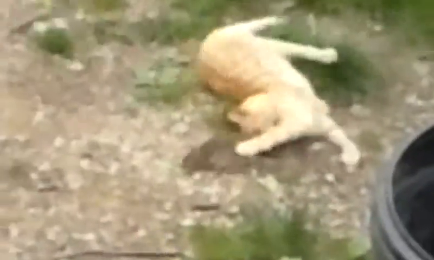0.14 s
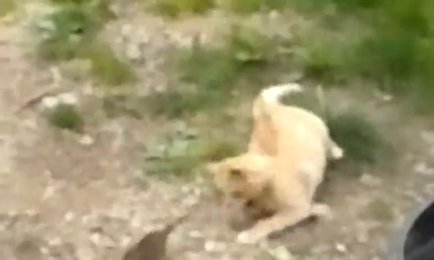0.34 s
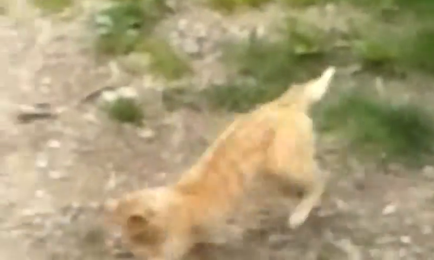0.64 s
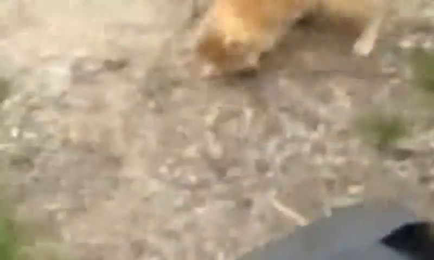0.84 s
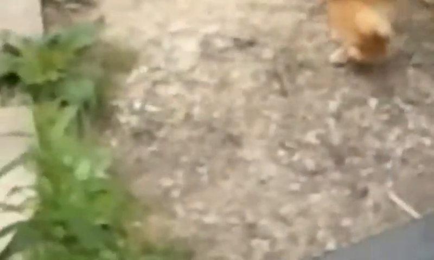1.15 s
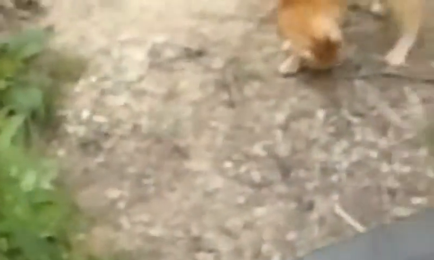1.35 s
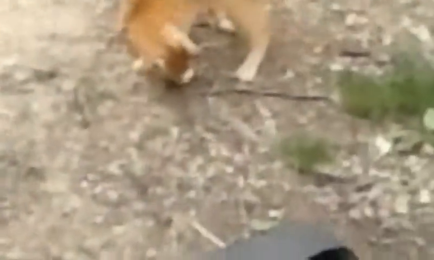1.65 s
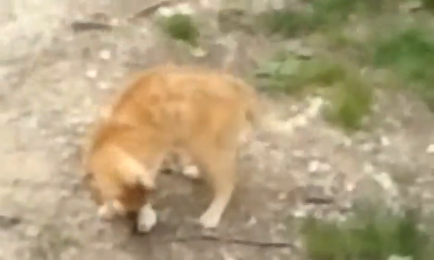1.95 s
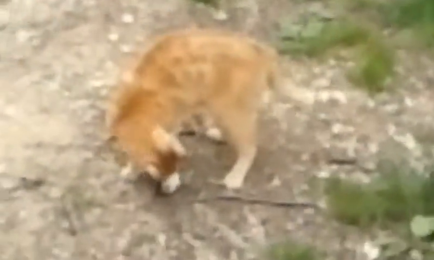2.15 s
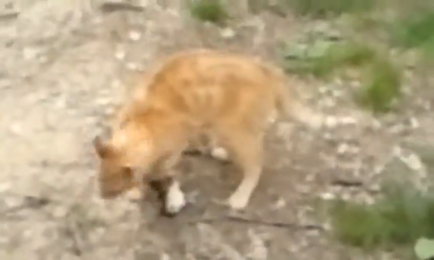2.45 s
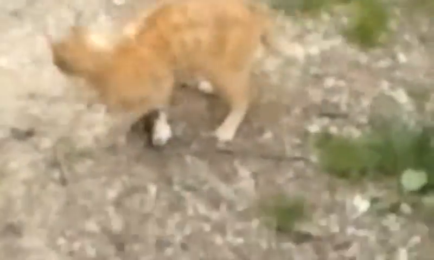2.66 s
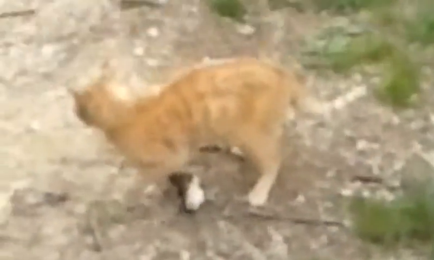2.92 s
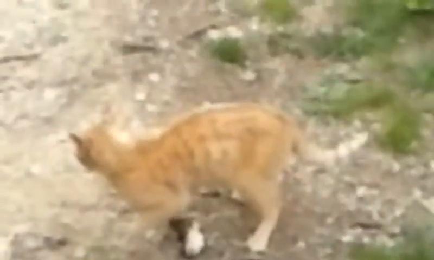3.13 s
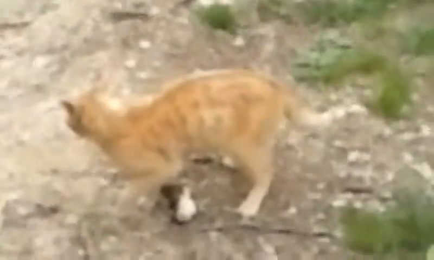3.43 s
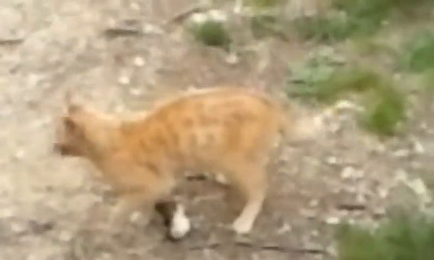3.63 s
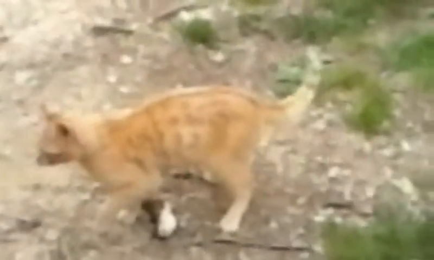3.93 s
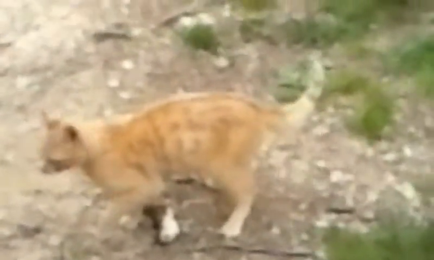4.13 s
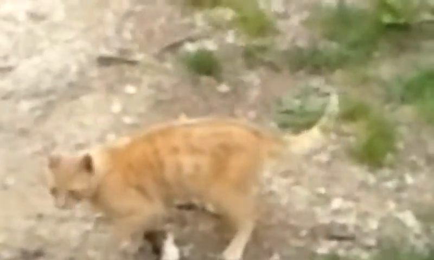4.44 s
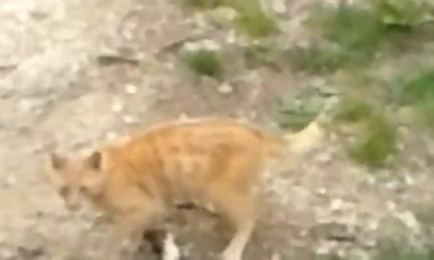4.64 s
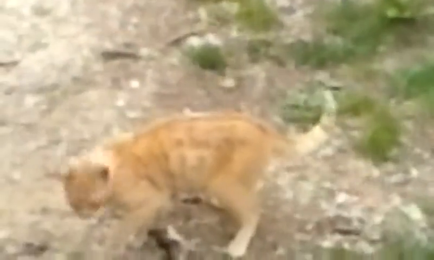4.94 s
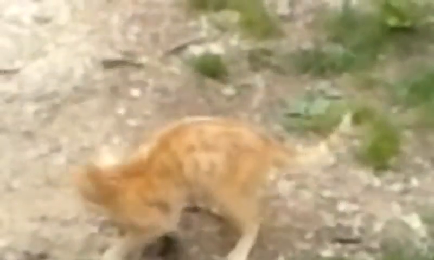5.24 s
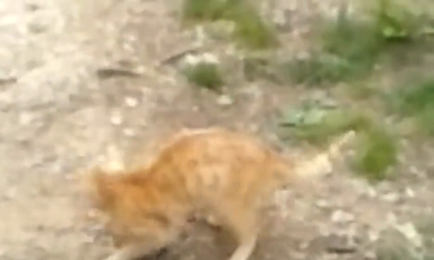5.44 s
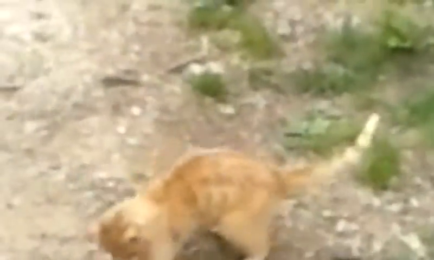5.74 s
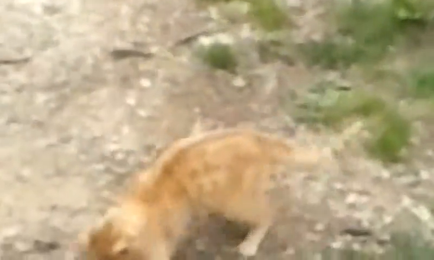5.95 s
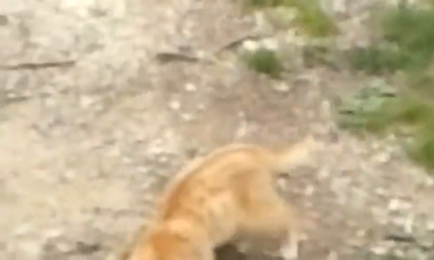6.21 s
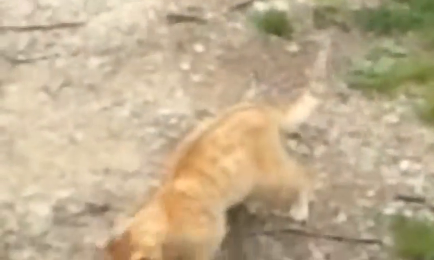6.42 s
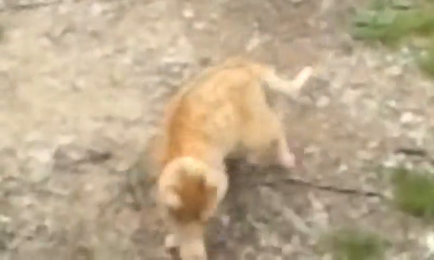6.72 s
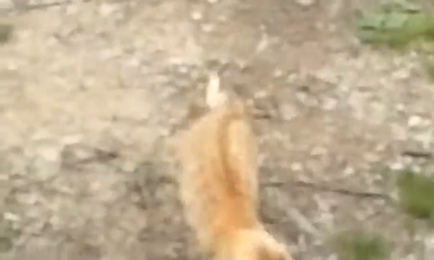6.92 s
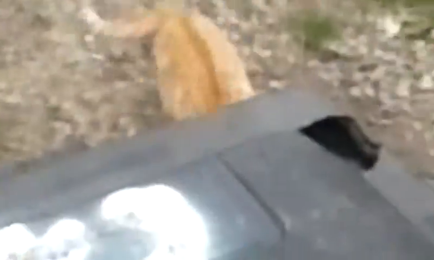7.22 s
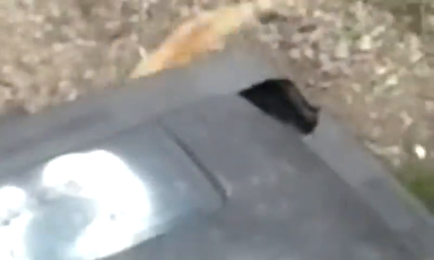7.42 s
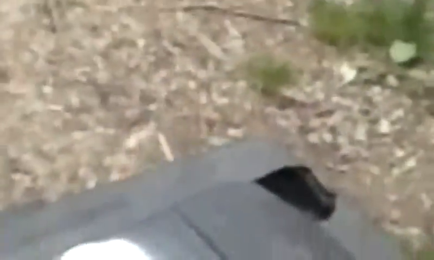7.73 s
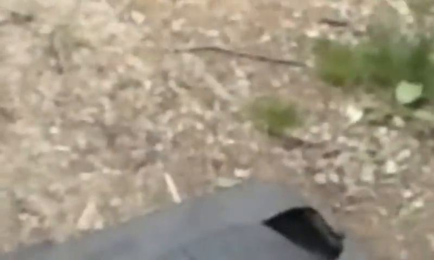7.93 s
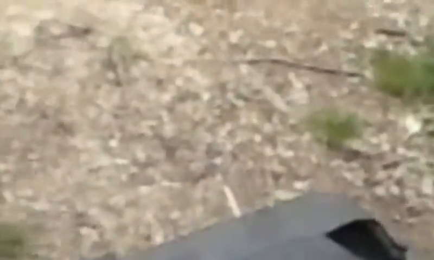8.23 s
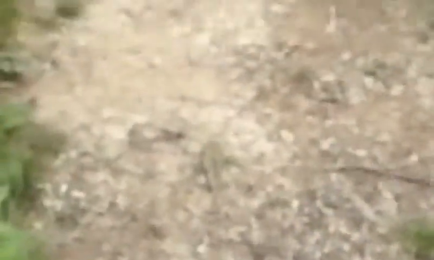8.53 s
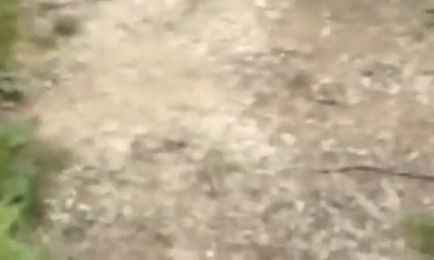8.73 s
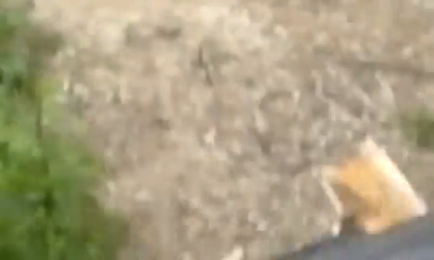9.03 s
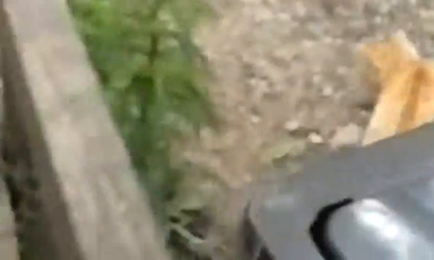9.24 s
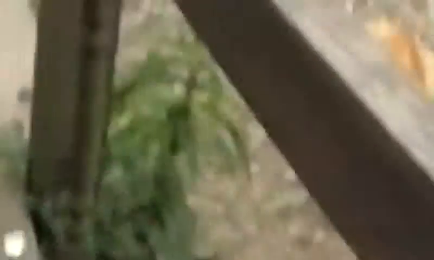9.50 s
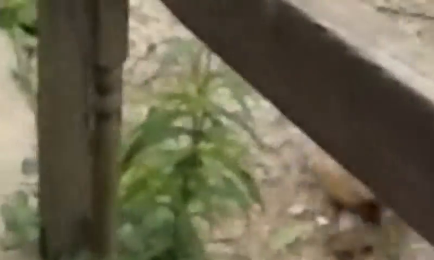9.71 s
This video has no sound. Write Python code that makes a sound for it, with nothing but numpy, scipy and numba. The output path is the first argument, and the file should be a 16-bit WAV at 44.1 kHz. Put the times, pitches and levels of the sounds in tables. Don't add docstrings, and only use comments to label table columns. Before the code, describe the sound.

Summer yard, one small handheld microphone, mono. Insects drone brightly and unevenly from start to end. A falling bird whistle comes early, followed by a finger tick, faint upward flicks about six a second, and a swelling seven-note trill. A tiny motor whine passes. Later a far vehicle speeds up, casing clicks and scrapes crowd in, and very high peeps sound close by, over low road rumble.

```python
import sys
import numpy as np
from scipy import signal
from scipy.fft import rfft, irfft, next_fast_len
from scipy.io import wavfile
from numba import njit

SR = 44100
rng = np.random.default_rng(int(sys.argv[2]) if len(sys.argv) > 2 else 0)


def store_pcm(level_fs):
    pcm = np.round(np.clip(level_fs, -1, 1) * 32767).astype(np.int16)
    wavfile.write(sys.argv[1], SR, np.atleast_2d(pcm).T)


def elevation(decibels):
    levels = np.asarray(decibels, float)
    return 10 ** (levels / 20)


N = 435266


def unit(x):
    return x / np.sqrt(np.mean(x ** 2))


def curve(table):
    s, *columns = np.transpose(table)
    return [np.interp(np.arange(N) / SR, s, c) for c in columns]


def swells(rows):
    t = np.arange(N) / SR
    total = np.zeros((2, N))
    for s, length, first_db, second_db in rows:
        rise = np.clip(1 - abs(t - s) / length, 0, 1)
        total += rise * np.array([[first_db], [second_db]])
    return total


def coloured(spectrum):
    hz, db = np.transpose(spectrum)
    size = next_fast_len(N)
    log_hz = np.log(np.arange(size // 2 + 1) * SR / size + 1)
    gain = elevation(np.interp(log_hz, np.log(hz), db, -120, -120))
    return unit(irfft(rfft(rng.standard_normal(size)) * gain, size)[:N])


def walk(rate):
    levels = rng.standard_normal(int(N / SR * 40))
    return 0.89 * np.interp(np.arange(N) * rate / SR, np.arange(len(levels)), levels)


@njit
def svf(x, hz, width):
    y, b, l = np.empty(len(x)), 0., 0.
    for i in range(len(x)):
        g, k = np.tan(np.pi * hz[i] / SR), width / hz[i]
        v = (b + g * (x[i] - l)) / (1 + g * (g + k))
        b, l, y[i] = 2 * v - b, l + 2 * g * v, k * v
    return y


def band(x, hz, width_hz):
    hz = np.full(len(x), 1.) * hz
    return svf(svf(x, hz, 1. * width_hz), hz, 1. * width_hz)


def add(out, s, sound):
    i = int(s * SR)
    out[i:i + len(sound)] += sound[:N - i]


def tone(rows, fade_s, wobble_hz=0.):
    s, hz, db = np.transpose(rows)
    t = np.arange(s[0], s[-1], 1 / SR)
    ends = np.clip(np.minimum(t - s[0], s[-1] - t) / fade_s, 0, 1)
    wobble = wobble_hz * np.interp(t - s[0], np.arange(64) / 180, rng.standard_normal(64))
    phase = 2 * np.pi * np.cumsum(np.interp(t, s, hz) + wobble) / SR
    return 2 ** .5 * ends * elevation(np.interp(t, s, db)) * np.sin(phase)


# (time [s], level [dB], centre [Hz])
CHORUS = [(0.0, -37, 7230), (0.96, -36, 6760), (1.43, -49.5, 6200), (1.65, -37.5, 7360),
          (2.83, -39.5, 7300), (3.49, -47, 6850), (3.57, -40.5, 7200), (3.85, -47, 6750),
          (3.96, -41.5, 6460), (4.51, -43, 6970), (6.95, -47.5, 6900), (7.53, -35.5, 7300),
          (7.75, -39.5, 7450), (8.6, -38.5, 7310), (9.02, -32.5, 7370), (9.32, -40, 7380),
          (9.62, -36.5, 7930), (9.87, -40.5, 7720)]
# (pitch [Hz], level [dB per Hz])
CHORUS_TOP = [(4710, -56), (8000, -17), (11800, -33), (15700, -35.5)]
# (peak time [s], rise and fall time, each [s], chorus change [dB], extra
# top change [dB])
CHORUS_SWELLS = [(.65, .2, 0, 4), (1.15, .1, 1, 2), (2.0, .5, 0, -4), (2.92, .12, 1, 8), (4.78, .07, 2, 2),
                 (5.85, .2, -7, 7), (6.1, .17, 4, 2), (6.6, .2, -4, 0), (6.85, .12, 2, 3), (7.2, .15, -1, -5),
                 (8.95, .2, 0, -6), (9.5, .14, -3, 6)]
CHORUS_MEAN_DB, TOP_DB, TOP_FOLLOW = -42.5, -7.5, 0.88


def insects():
    level_db, centre_hz = curve(CHORUS)
    shade_db, bright_db = swells(CHORUS_SWELLS)
    level_db = level_db + shade_db
    clicks = rng.standard_normal(N) * elevation(3.0 * np.minimum(rng.exponential(size=N), 5))
    body = unit(band(clicks, centre_hz, 2100)) * elevation(level_db - 0.57 + 1.46 * walk(25))
    top_db = CHORUS_MEAN_DB + TOP_DB + bright_db + TOP_FOLLOW * (level_db - CHORUS_MEAN_DB)
    return body + coloured(CHORUS_TOP) * elevation(top_db + 1.8 * walk(12))


def foliage(note, scatter_db, perch, spread_s=0.0093, gap_s=.003):
    trees_db, t60 = perch
    sway_per_s, sway_share = 45, .1
    t, size = np.arange(SR // 2) / SR, np.linalg.norm(note)
    near = rng.standard_normal(len(t)) * np.exp(-t / spread_s) * (t > gap_s)
    far = rng.standard_normal(len(t)) * elevation(-60 * t / t60) * (t > .025)
    sway_steps = np.arange(len(note) + len(t) - 1) * sway_per_s / SR
    sway = np.interp(sway_steps, np.arange(256), rng.standard_normal(256))
    far = signal.fftconvolve(note, far) * (np.sqrt(1 - sway_share) + np.sqrt(sway_share) * sway)
    near = signal.fftconvolve(note, near[:SR // 8])
    echo = far * elevation(trees_db) * size / np.linalg.norm(far)
    share = np.hypot(1, elevation(scatter_db))
    add(echo, 0, near * size / np.linalg.norm(near) * elevation(scatter_db) / share)
    add(echo, 0, note / share)
    return echo


def whistle(row, habit):
    s, length, from_hz, to_hz, db = row
    glide, peak, start_db, end_db = habit
    share = np.sort(np.clip([0, glide, peak, 1], 0, 1))
    pitch_hz = np.interp(share, [0, glide], [from_hz, to_hz])
    level_db = db + np.interp(share, [0, peak, 1], [start_db, 0, end_db])
    return np.c_[share * length, pitch_hz, level_db]


# (far trees level [dB], time to fade by 60 dB [s])
OPEN_PERCH, SOFT_PERCH, RISING_PERCH = (-10, .7), (-10, .35), (-6, .5)
TRILL_PERCH, SLIDE_PERCH = (-8.5, .5), (-10.5, .42)

# (time [s], peak level [dB], pitch [Hz])
TRILL = [
    (5.177, -34, 3980),
    (5.3134, -35, 4040),
    (5.4463, -28, 4250),
    (5.5802, -23, 4300),
    (5.706, -20, 4380),
    (5.8306, -19.5, 4400),
    (5.9574, -19.5, 4404),
]
# (time after start [s], pitch [Hz], level [dB])
TRILL_MAIN = [(-.004, 4800, -14), (.002, 4520, 0), (.007, 4300, -1), (.012, 4190, -12), (.028, 4130, -19)]
# (time after start [s], pitch [Hz], level [dB])
TRILL_OPENING = [(-.006, 4700, -9), (.004, 4300, -5), (.011, 3980, 0), (.02, 3830, -9)]
# (time after start [s], pitch [Hz], level [dB])
TRILL_GRACE = [(-.015, 5800, -3), (-.008, 5500, 0), (0, 5200, 1), (.006, 4900, -1)]
# (time after start [s], pitch [Hz], level [dB])
TRILL_ANSWER = [(.062, 3620, 1), (.069, 3400, 1), (.074, 3000, -4), (.08, 2500, 0)]


def trill():
    out = np.zeros(N)
    for s, db, hz in TRILL:
        opening = s < 5.4
        shy_db = -11 if opening else 0
        main = TRILL_OPENING if opening else np.array(TRILL_MAIN) * [1, hz / 4394, 1]
        parts = ((main, -2.5, -5.5), (TRILL_GRACE, -13 + shy_db, 9), (TRILL_ANSWER, -18.5 + shy_db, -2))
        for note, rel_db, scatter_db in parts:
            sound = foliage(tone(note, 0.0013, wobble_hz=60), scatter_db, TRILL_PERCH, spread_s=0.016, gap_s=.008)
            add(out, s + note[0][0], elevation(db + rel_db) * sound)
    return out


# (time [s], length [s], start pitch [Hz], goal pitch [Hz], peak level [dB])
LOW_BIRD = [(0.0, 0.045, 2674, 2700, -50), (0.103, .07, 2600, 2340, -35), (0.275, 0.08, 2775, 2358, -34),
            (0.445, .068, 2820, 2280, -31), (7.285, .025, 2680, 2520, -52), (7.31, 0.055, 2450, 2420, -51),
            (8.29, 0.035, 2330, 2300, -54), (8.425, 0.06, 2340, 2300, -54)]
# (time [s], length [s], start pitch [Hz], goal pitch [Hz], peak level [dB])
MID_BIRD = [
    (0.668, 0.105, 3500, 2780, -25.5),
    (1.02, .08, 2950, 3050, -50),
    (7.72, 0.08, 3120, 3360, -49),
]
# (time [s], length [s], start pitch [Hz], goal pitch [Hz], peak level [dB])
SOFT_OPENER = (2.5, .185, 1680, 1930, -43)
# (time [s], length [s], start pitch [Hz], goal pitch [Hz], peak level [dB])
SLIDES = [(1.3, .065, 2335, 2030, -39), (9.075, .075, 3100, 3380, -42), (9.19, .1, 3450, 3470, -44),
          (9.642, .1, 2790, 2660, -43.5), (9.735, .045, 2740, 2640, -43), (9.615, .03, 3100, 2800, -50),
          (9.81, .03, 2720, 2660, -52), (9.845, .02, 2700, 2740, -50), (9.505, .04, 3560, 3580, -53),
          (1.2, .065, 2800, 2850, -46)]
# (time [s], length [s], start pitch [Hz], goal pitch [Hz], peak level [dB])
HIGH_BIRD = [(0.56, .06, 6100, 6330, -42), (0.78, .06, 6450, 6500, -40), (.86, .04, 6300, 5960, -40),
             (3.94, .12, 5880, 6300, -38.5), (4.05, 0.21, 6280, 6380, -45), (4.28, 0.046, 5920, 5800, -45),
             (7.25, 0.045, 6300, 5850, -44), (7.298, .07, 5980, 5830, -41), (7.378, .04, 5930, 6060, -41),
             (7.425, .045, 6080, 6100, -45), (7.535, .04, 6050, 5980, -46), (7.59, .045, 5950, 5750, -47),
             (7.12, .05, 5050, 5350, -47), (7.19, .05, 6400, 6700, -45), (6.085, .08, 4300, 5100, -52)]
# (share of note gliding, share at the peak, start level [dB], end level [dB])
LOW_HABIT, MID_HABIT, HIGH_HABIT = (.6, .45, -13, -3), (0.72, 0.7, -24, -15), (0.9, 0, -5, -3)
# (share gliding, share at the peak, start level [dB], end level [dB])
OPENER_HABIT = (.45, .5, -15, -4)
# (share gliding, share at the peak, start level [dB], end level [dB])
SLIDE_HABIT = (.9, .25, -7, -9)


def whistling_birds():
    out = np.zeros(N)
    for flock, habit, scatter_db, wobble_hz, perch in (
            (LOW_BIRD, LOW_HABIT, -11, 12, OPEN_PERCH),
            (MID_BIRD, MID_HABIT, -10, 12, OPEN_PERCH),
            ([SOFT_OPENER], OPENER_HABIT, -6, 20, SOFT_PERCH),
            (SLIDES, SLIDE_HABIT, -8, 20, SLIDE_PERCH),
            (HIGH_BIRD, HIGH_HABIT, -5, 70, SLIDE_PERCH)):
        for row in flock:
            add(out, row[0], foliage(tone(whistle(row, habit), 0.0024, wobble_hz), scatter_db, perch))
    return out


# (time [s], length [s], start pitch [Hz], goal pitch [Hz], peak level [dB])
PEEPS = [
    (8.905, .025, 7050, 7755, -25.5),
    (8.98, .02, 7599, 7800, -28),
    (9.05, .02, 7638, 7675, -25),
]
PEEP_HABIT = (1.2, .55, -13, -12)  # (share gliding, share at the peak, start level [dB], end level [dB])


def peeping_bird():
    out = np.zeros(N)
    for row in PEEPS:
        add(out, row[0], tone(whistle(row, PEEP_HABIT), .004))
    return out


# (mid-sweep time [s], level [dB], change of the flat foot [dB])
RISING = [(1.647, -53, -1), (1.808, -44, -25), (1.99, -52, 2), (2.308, -55, -1), (2.488, -52, 4),
          (2.656, -50, 6), (2.846, -40.5, -8.5), (3.012, -44.5, 2), (3.172, -45.5, 6), (3.32, -43, 1),
          (3.478, -42.5, 2), (3.633, -40.5, -5), (3.784, -39.5, -13), (3.94, -41, 4.5), (4.086, -42, 3),
          (4.234, -41.5, -2), (4.38, -42.5, -10), (4.531, -41, 1), (4.681, -44.5, 5), (4.831, -46, 7),
          (4.982, -46, 6)]
# (time from mid sweep [s], pitch [Hz], level [dB])
RISING_NOTE = [(-.038, 2640, -10), (-.022, 2720, -2), (-.012, 2850, 4.5), (-.001, 3200, 0),
               (.007, 3480, -7), (.014, 4050, -15)]


def rising_flicks():
    out = np.zeros(N)
    for s, db, foot_db in RISING:
        note = np.array(RISING_NOTE)
        note[:2, 2] += foot_db
        sound = foliage(tone(note, 0.0041, wobble_hz=70), -2, RISING_PERCH, spread_s=0.013, gap_s=.006)
        add(out, s + note[0, 0], elevation(db - 3.8) * sound)
    return out


# (time [s], length [s], top pitch [Hz], peak level [dB])
SOFT_BIRD = [(1.722, 0.11, 1880, -50), (3.019, 0.095, 1970, -45.5), (3.327, .11, 1980, -44),
             (3.669, .08, 2053, -44), (4.0, 0.09, 1980, -43.5), (4.335, .11, 1933, -49),
             (4.665, .115, 1930, -46), (5.035, 0.075, 1950, -44)]


def soft_bird():
    out = np.zeros(N)
    for s, length, hz, db in SOFT_BIRD:
        arch = [(0, 0.9 * hz, db - 11), (.35 * length, hz, db), (length, .9 * hz, db - 13)]
        add(out, s, foliage(tone(arch, 0.0028, wobble_hz=45), -2, SOFT_PERCH))
    return out


# (time [s], length [s], start pitch [Hz], end pitch [Hz], level [dB])
HOARSE = [(1.743, 0.037, 4620, 4260, -48.5), (5.029, 0.044, 4530, 3980, -52),
          (6.995, .015, 5050, 4900, -52), (7.005, .07, 4400, 4380, -50), (7.02, .07, 4620, 4560, -55),
          (7.23, .07, 3250, 3150, -54), (7.118, .01, 2750, 2950, -51), (7.83, .03, 3200, 3100, -58),
          (8.49, .04, 3000, 2950, -55), (8.55, .03, 2350, 2330, -54), (1.36, .06, 2150, 2250, -50),
          (1.47, .04, 2900, 2950, -53), (1.82, .03, 3300, 3800, -50), (8.77, .05, 3800, 3950, -48),
          (4.2, .012, 3650, 4050, -52), (8.36, 0.06, 4520, 4250, -50), (8.415, 0.038, 2950, 3480, -54),
          (8.6, .04, 3150, 2950, -55), (8.832, .03, 4900, 4100, -44), (8.88, .035, 4300, 4200, -47),
          (9.438, 0.012, 3700, 3600, -45), (9.46, .02, 3600, 3600, -52), (9.46, .04, 3950, 3900, -55),
          (8.735, 0.021, 3250, 2950, -49)]


def hoarse_birds():
    out = np.zeros(N)
    for s, length, from_hz, to_hz, db in HOARSE:
        call = tone([(0, from_hz, db), (length, to_hz, db - 3)], 0.0017, wobble_hz=150)
        add(out, s, foliage(call, 3, TRILL_PERCH, spread_s=.018))
    return out


# (time [s], peak level [dB], low-end level [dB])
TICKS = [(0.902, -22, -7), (2.216, -29, -16), (2.8768, -25, -35), (2.8818, -27, -35), (2.888, -28, -35),
         (3.579, -41, -16), (3.8714, -24, -11), (5.435, -20, -25), (5.987, -38, -1), (6.2701, -31, -32),
         (7.3685, -22, -24), (7.464, -22, -12), (7.4715, -22, -9), (7.474, -15, 1), (7.5286, -33, -25),
         (8.6182, -26, -26), (9.0124, -15, -19), (9.0145, -18, -15), (9.015, -20, -6), (9.4129, -31, -13),
         (9.4421, -17, -8), (9.444, -22, 0), (9.4697, -20, -13), (9.4773, -21, -19), (9.4834, -17.5, -10),
         (9.4872, -19.5, -29), (9.4991, -26, -13), (9.505, -22, -8)]


def ticks():
    out, t = np.zeros(N), np.arange(SR // 2) / SR
    port = np.sin(2 * np.pi * 8000 * t) * np.exp(-t / 0.0004)
    port += 0.33 * np.sin(2 * np.pi * 13000 * t) * np.exp(-t / .0001)
    shell = np.sin(2 * np.pi * 2200 * t) * np.exp(-t / 0.00014)
    for s, db, low_db in TICKS:
        add(out, s, elevation(db) * (port + elevation(low_db) * shell))
    return out


# (time [s], peak level [dB], pitch [Hz], time to fade by 60 dB [s])
KNOCKS = [
    (.652, -39, 115, .1),
    (2.876, -29.5, 87, 0.1),
    (5.306, -32, 125, 0.18),
    (7.481, -18, 111, 0.028),
    (9.047, -28.5, 111, 0.06),
    (9.057, -27.5, 130.6, 0.4),
]


def knocks():
    out, t = np.zeros(N), np.arange(SR // 2) / SR
    for s, db, hz, t60 in KNOCKS:
        phase = 2 * np.pi * np.cumsum(hz * (0.61 + 1.45 * np.exp(-t / 0.0046))) / SR
        add(out, s, -elevation(db + 3.5 - 60 * t / max(t60, .01)) * np.sin(phase))
    return out


# (time [s], length [s], level [dB], centre [Hz], width [Hz])
SCRAPES = [(2.8755, 0.012, -30, 8500, 4500), (2.89, 0.019, -39, 9000, 4500),
           (3.568, 0.05, -37.5, 7300, 3100), (3.588, .012, -49, 12000, 5000),
           (1.479, .01, -53, 12000, 6000), (5.985, .015, -52, 12000, 6000), (2.876, .02, -41, 13000, 5000),
           (7.37, .012, -49, 12000, 6000), (9.502, .008, -38, 500, 900), (7.478, 0.014, -40, 10600, 8800),
           (8.749, 0.132, -50.5, 1970, 520), (8.752, .12, -48, 2900, 2000), (8.765, .07, -47, 4300, 1800),
           (8.83, .04, -45, 5000, 1800), (8.85, .09, -48, 4500, 1400), (8.75, .2, -44, 6200, 1800),
           (9.013, 0.02, -29.5, 554, 250), (7.4, .06, -47, 550, 200), (9.011, 0.01, -42, 2400, 1800),
           (9.044, 0.0247, -35.5, 380, 400), (2.21, 0.03, -48, 1700, 780), (7.09, 0.045, -52, 2950, 900),
           (7.416, .01, -42, 600, 700), (9.61, 0.11, -37.5, 7900, 2000), (5.3, 0.075, -43, 170, 144),
           (.65, 0.06, -43, 110, 170), (9.065, 0.12, -41, 230, 330), (7.485, 0.045, -35, 65, 33),
           (8.29, 0.037, -44, 490, 84)]


def scrapes():
    out = np.zeros(N)
    for s, length, db, hz, width_hz in SCRAPES:
        n = int(length * SR)
        edge_share = min(.002 / length + 3 * length, 1)
        swell = signal.windows.tukey(n, edge_share) * np.linspace(1, .6, n)
        grit = rng.standard_normal(SR // 4)[:n] * swell
        add(out, s, elevation(db) * unit(band(grit, hz, width_hz)))
    return out


# (multiple of the step rate, level [dB])
MOTOR_ORDERS = [(8, -56), (9, -60), (10, -66)]


def lens_motor():
    start_s, length_s, step_hz = 5.585, 0.12, 1436.
    out = np.zeros(N)
    hiss = unit(band(rng.standard_normal(int(length_s * SR)), 12500, 5000))
    add(out, start_s, elevation(-64) * hiss)
    for multiple, db in MOTOR_ORDERS:
        hz = int(multiple) * step_hz
        add(out, start_s, tone([(0, hz, db), (length_s, hz, db)], .004))
    return out


# (time [s], level [dB], centre [Hz])
TYRES = [(0, -85, 620), (5.5, -75, 650), (7.0, -62, 720), (7.4, -55, 700), (7.8, -63, 750), (8.8, -63, 820),
         (9.4, -56, 900), (9.87, -54, 970)]


def tyres():
    level_db, centre_hz = curve(TYRES)
    return unit(band(rng.standard_normal(N), centre_hz, 330)) * elevation(level_db + 2.5 * walk(14))


# (time [s], length
# [s], pitch at start [Hz], pitch at end [Hz], level [dB])
LOW_HUMS = [(2.7, 2.07, 92.04, 101, -50.5), (5.5, 2.25, 93.65, 86, -52.5), (7.6, 0.82, 87.8, 91, -47.5),
            (8.6, .4, 87.7, 92, -49.5), (9.05, 0.46, 93.2, 90, -41), (9.35, 0.56, 88.4, 100, -46.5),
            (2.9, 1.8, 125.4, 126.5, -58.5), (5.4, 1.4, 124.5, 121, -54), (6.6, 1.3, 124, 124, -52.5),
            (8.1, 0.29, 114, 115.5, -56)]


def low_hums():
    out = np.zeros(N)
    for s, length, from_hz, to_hz, db in LOW_HUMS:
        add(out, s, tone([(0, from_hz, db), (length, to_hz, db)], 0.1))
    return out * (1 + .75 * walk(22)) * elevation(1.5 * walk(5))


def patchy(x, lo_hz, count, patchy_db, rate):
    out = x.copy()
    for hz in lo_hz * 2 ** (np.arange(count) / 4):
        one_band = signal.lfilter(*signal.iirpeak(hz, 7, SR), x)
        out += (elevation(patchy_db * walk(rate)) - 1) * one_band
    return out


# (time [s], level [dB])
TRAFFIC = [(0.0, -2.5), (.9, 1), (1.5, 0), (2.55, -1), (3.5, -2), (4.9, -2.5), (5.5, 1), (6.2, 1.5),
           (7.0, 4), (7.7, 4), (8.3, 6), (8.6, 4.5), (9.0, 4), (9.87, 3)]
# (peak time [s], rise and fall time, each [s], leaves change [dB],
# twitter change [dB])
GUSTS = [(0.0, 0.46, 3.5, 7.5), (0.903, 0.58, 6, 6), (1.7, 1.2, 3.5, 4.5), (4.2, 1.7, -1, 4.5),
         (5.883, 0.49, -1.5, 3), (7.332, 0.36, 6.5, 7), (8.596, 0.69, 6, 2), (9.006, 0.39, 2, 6)]
# (pitch [Hz], level [dB per Hz])
RUMBLE = [(15, -58), (25, -28), (70, 1), (98, 0), (134, -3.5), (242, -9.5), (409, -14), (500, -25),
          (650, -47), (1100, -120)]
# (pitch [Hz], level [dB per Hz])
ROAD = [(210, -33), (350, -2), (387, -4.5), (478, -5.5), (575, -2.5), (741, 0.5), (956, -4), (1080, -8.5),
        (1600, -16.5), (2080, -24), (3520, -120)]
# (pitch [Hz], level [dB per Hz])
LEAVES = [(650, -33), (1100, -0.5), (2310, 0), (3140, -5.5), (3300, -19), (4290, -53), (7260, -120)]
# (pitch [Hz], level [dB per Hz])
TWITTER = [(1760, -46), (3000, -8), (4090, -6), (5010, -8), (6000, 0), (7800, -13), (13200, -120)]


def background():
    traffic_db, = curve(TRAFFIC)
    leaves_db, twitter_db = swells(GUSTS)
    out = coloured(RUMBLE) * elevation(-51.5 + 1.1 * traffic_db + 3.5 * walk(9))
    out += coloured(ROAD) * elevation(-54.5 + 1.24 * traffic_db + 1.67 * walk(16))
    out += coloured(LEAVES) * elevation(-59.5 + leaves_db + 0.99 * walk(18))
    out += coloured(TWITTER) * elevation(-55.5 + twitter_db + 1.0 * walk(20))
    return patchy(out, 222.3, count=19, patchy_db=3.5, rate=11)


def scene():
    birds = trill() + whistling_birds() + peeping_bird() + rising_flicks() + soft_bird() + hoarse_birds()
    handling = ticks() + knocks() + scrapes() + lens_motor()
    distance = tyres() + low_hums() + background()
    return np.tile(insects() + birds + handling + distance, (2, 1))


def roll_off(x):
    return signal.sosfilt(signal.butter(12, 16740, fs=SR, output="sos"), x)


def record(dry):
    hiss = np.diff(rng.standard_normal(N + 1)) * elevation(-72)
    low_pass = signal.ellip(10, .2, 70, 15750, fs=SR, output="sos")
    high_pass = signal.butter(3, 33, "high", fs=SR, output="sos")
    mix = signal.sosfilt(high_pass, signal.sosfilt(low_pass, dry + hiss))
    return roll_off(mix)


dry = scene()
out = record(dry)
store_pcm(out)
```